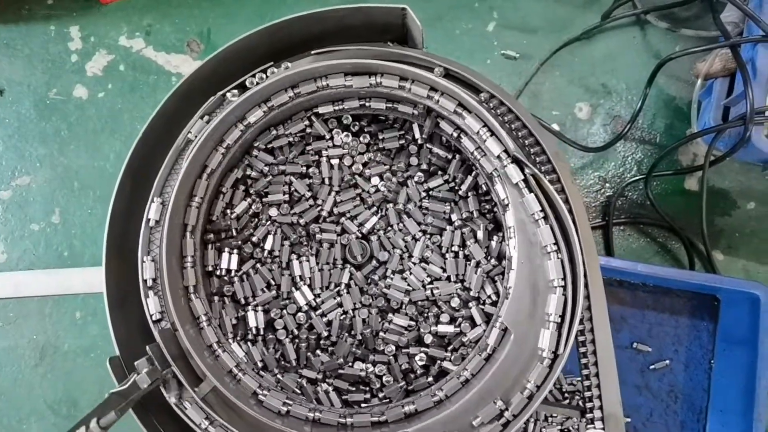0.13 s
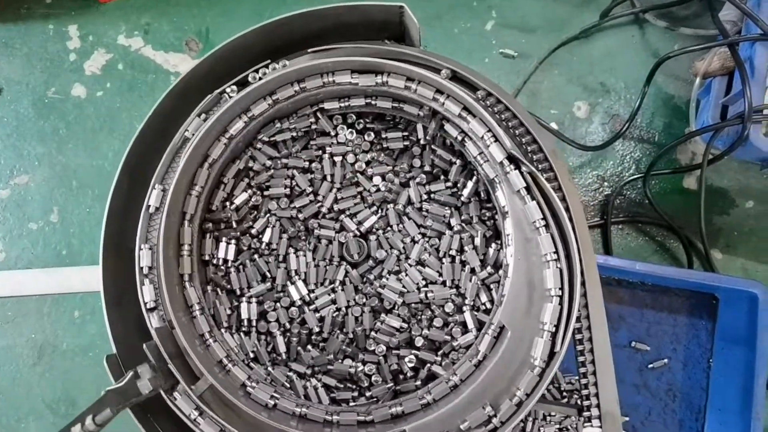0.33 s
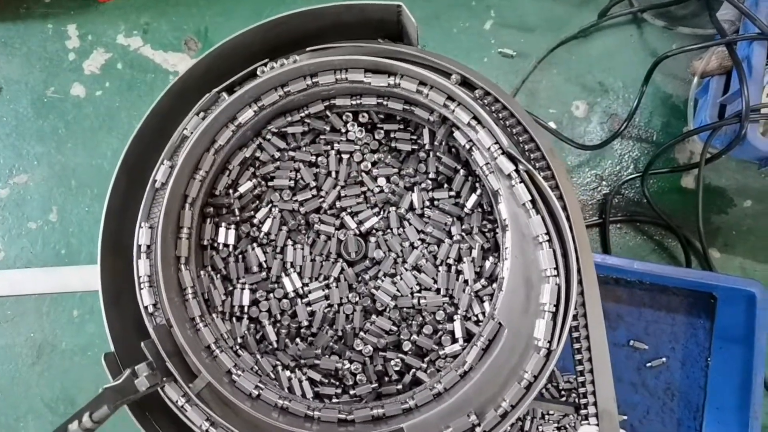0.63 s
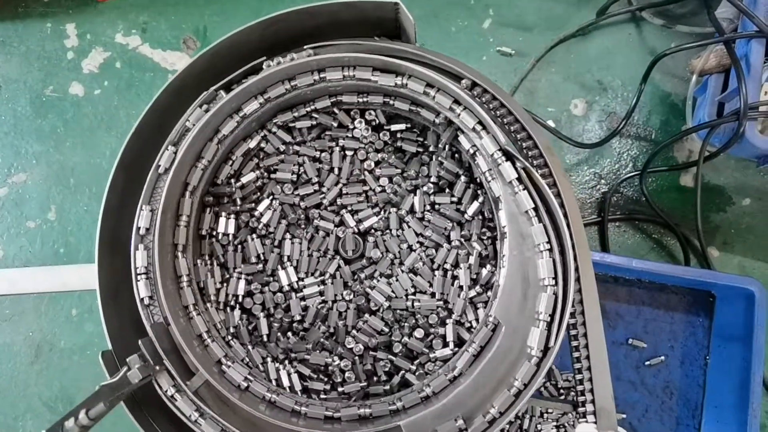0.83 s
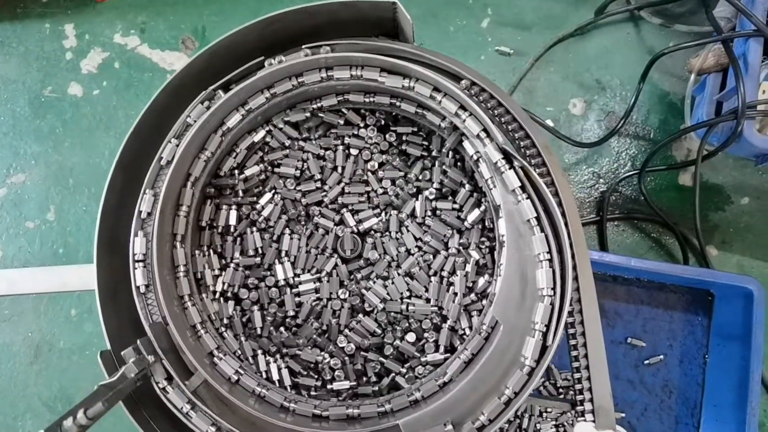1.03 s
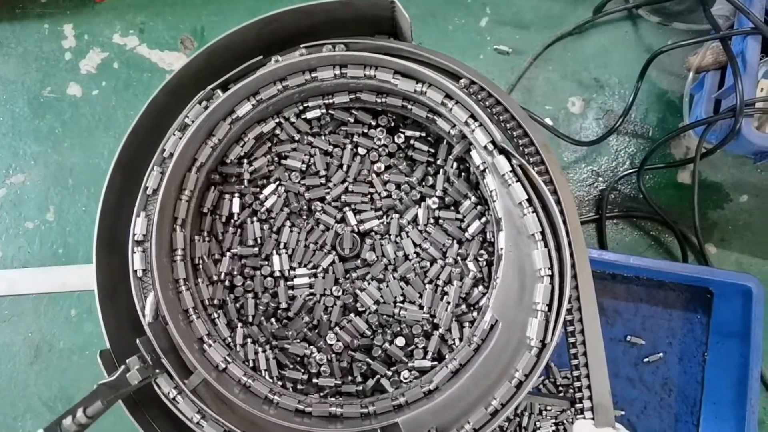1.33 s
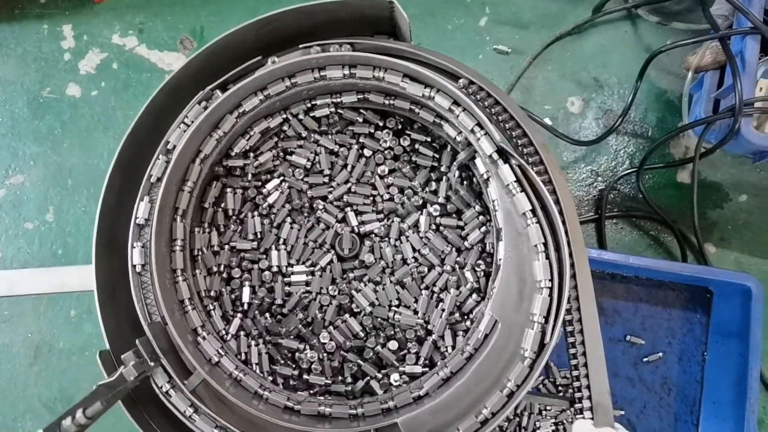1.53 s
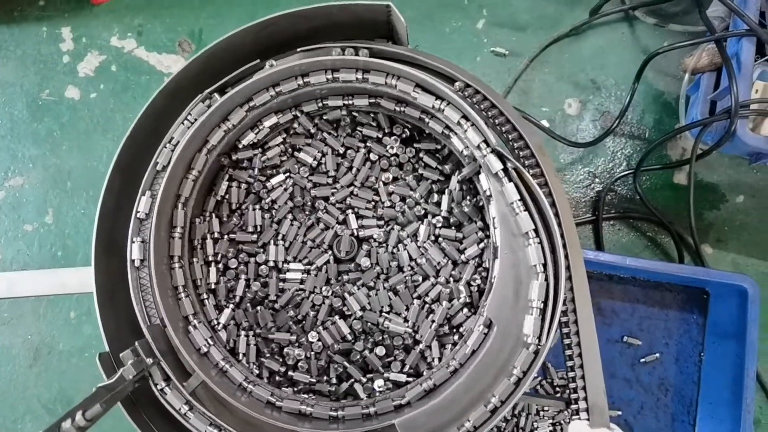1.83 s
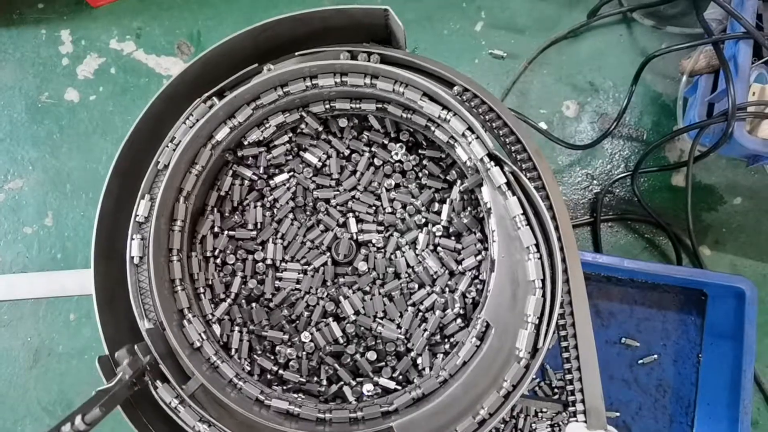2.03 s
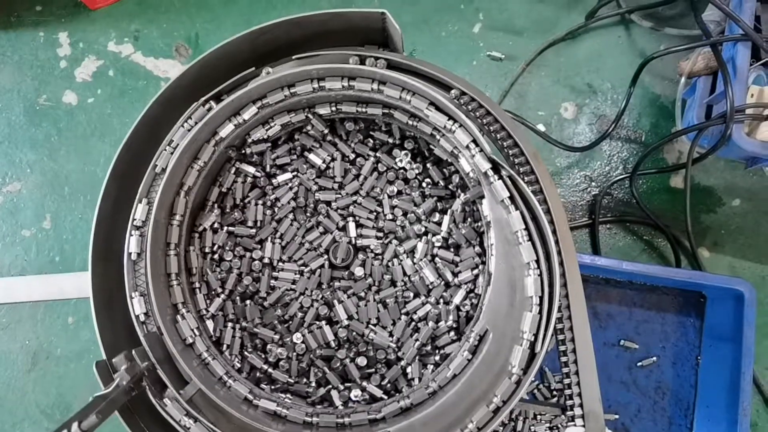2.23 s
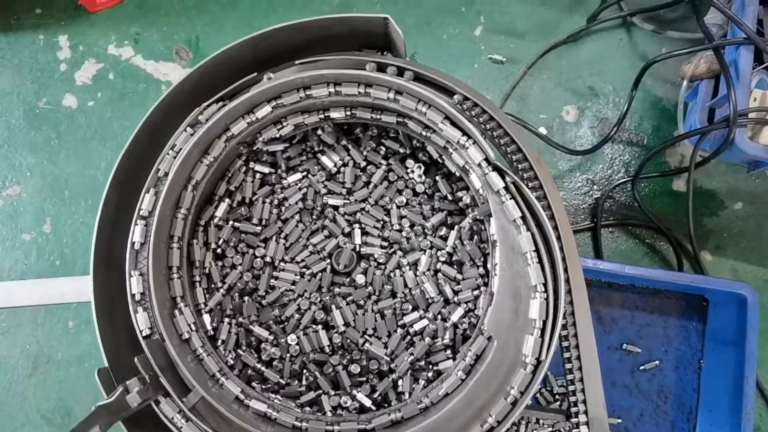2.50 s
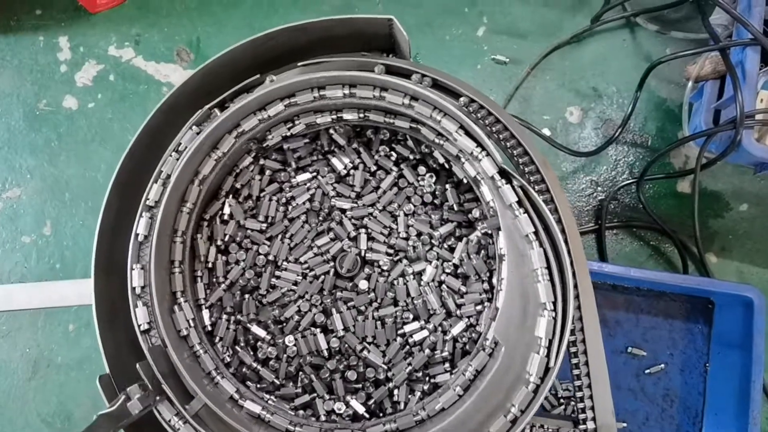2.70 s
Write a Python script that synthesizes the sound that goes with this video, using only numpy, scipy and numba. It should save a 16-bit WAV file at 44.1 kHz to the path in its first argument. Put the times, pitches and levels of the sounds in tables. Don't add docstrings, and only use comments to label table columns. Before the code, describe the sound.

A dense, bright rattle of countless small metal bolts in a vibrating steel bowl runs throughout, with ticks, short pings and a few bounces, above low electric hum and workshop rumble, picked up close in stereo by a phone.

```python
import sys
import numpy as np
from scipy import signal
from scipy.fft import rfft, irfft
from scipy.io import wavfile
from scipy.ndimage import uniform_filter1d
from numba import njit

SR = 44100
rng = np.random.default_rng(int(sys.argv[2]) if len(sys.argv) > 2 else 0)


def gain_from_db(level_db):
    decades = np.asarray(level_db, float) / 20
    return 10 ** decades


def file_out(sig):
    cols = np.atleast_2d(sig).T
    lim = np.clip(cols, -1, 1)
    pcm = np.round(lim * 32767).astype(np.int16)
    wavfile.write(sys.argv[1], SR, pcm)


N = 126126
t = np.arange(N) / SR
MAINS_HZ, FAN_HZ = 49.972, 43.26
TICK_LAG = 9.94


def level(x, db):
    return x * gain_from_db(db) / np.sqrt(np.mean(x ** 2))


def colour(x, points):
    hz, db = np.array(points).T
    f = np.maximum(np.arange(N // 2 + 1) * SR / N, 1)
    gain_db = np.interp(np.log(f), np.log(hz), db, left=db[0] - 13)
    return irfft(rfft(x) * gain_from_db(gain_db), N)


def walk(rate):
    hold = int(SR / rate)
    steps = np.repeat(rng.standard_normal(N // hold + 1), hold)
    w = uniform_filter1d(steps, hold)[:N]
    return w / w.std()


@njit
def ring(n, at, hz, fall, size, lag, contact):
    out = np.zeros((2, n))
    for g in range(len(at)):
        turn = np.exp(complex(-fall[g], hz[g]))
        soften = np.exp(-contact * fall[g])
        for c in range(2):
            start = at[g] + c * lag[g]
            i = max(int(start) + 1, 0)
            z = size[g] * np.exp(complex(-fall[g], hz[g]) * (i - start))
            soft = np.exp(-contact * fall[g] * (i - start))
            for j in range(i, min(n, i + int(5 / fall[g]))):
                out[c, j] += z.imag * (1 - soft)
                z, soft = z * turn, soft * soften
    return out


def hits(at_s, hz, t60, size, lag):
    one = np.ones(len(at_s))
    fall = one * np.log(1000) / (t60 * SR)
    return ring(N, at_s * SR, one * hz * 2 * np.pi / SR, fall, size * one, lag * one, 2.1)


# (time [s], rattle level [dB], hum level [dB])
LOUDNESS = [(0.0, -20, -33), (0.02, -24, -32), (0.22, -24.5, -29.5), (0.24, -24.5, -32),
            (0.94, -24.5, -30.5), (0.97, -23.5, -34), (1.0, -24, -28), (1.04, -25, -35),
            (1.07, -24.5, -30.5), (1.76, -24, -31), (1.78, -26, -41), (1.81, -25.5, -33.5),
            (1.88, -24, -30), (2.09, -24, -32.5), (2.13, -25, -31), (2.3, -24, -33.5), (2.78, -25, -32.5),
            (2.86, -24.5, -34.5)]


def loudness(column):
    rows = np.array(LOUDNESS)
    return np.interp(t, rows[:, 0], rows[:, column])


def shake():
    turn = 2 * np.pi * MAINS_HZ * t
    cycle_db = 1.9 * np.cos(turn - 2 * np.pi * .525)
    half_cycle_db = 4.2 * np.cos(2 * (turn - 2 * np.pi * .03))
    uneven_db = .7 * 1.7 * np.tanh(walk(2 * MAINS_HZ))
    surge_db = .3 * walk(15)
    return gain_from_db(cycle_db + half_cycle_db + uneven_db + surge_db)


def strength(at_s, force, scatter_db):
    extra_db = scatter_db * np.minimum(rng.exponential(size=len(at_s)), 4)
    return np.interp(at_s, t, force) * gain_from_db(extra_db) * rng.choice([-1, 1], len(at_s))


# (pitch [Hz], pitch spread [Hz], time to fade by 60 dB [s],
# level [dB], port lag [samples], lag spread [samples])
FAMILIES = [(800, 59, 0.09, -26, 6.5, 2), (1498, 109.6, 0.048, -19.5, 2.3, 2.3),
            (2080, 110, 0.041, -14, 12.7, 6.1), (2390, 99, 0.052, -11, 15.5, 2.1),
            (3001, 296, 0.048, -9, 12.6, 2.3), (3840, 104, 0.035, -4, 12.8, 3.14),
            (4235, 179, 0.021, -2, 12.75, 1.36), (6120, 236, 0.055, -5.5, 9.74, 4.4),
            (7254, 395, 0.046, -4, 10, 1.3), (9090, 210, 0.057, -7.5, 10.5, 3.84),
            (9630, 448, 0.054, -7, 9.2, 3.47), (11300, 540, 0.068, -7.5, 10, 4)]
# (time [s], centre pitch [Hz], level [dB])
CLANG = [(0.0, 4050, -27.5), (0.17, 4000, -24), (0.28, 4020, -37.5), (0.33, 4020, -31), (0.43, 4060, -32.5),
         (0.54, 3980, -30), (0.67, 4210, -29), (0.94, 3860, -33), (0.95, 3940, -27), (1.11, 4150, -30.5),
         (1.29, 4030, -40), (1.33, 3940, -29.5), (1.82, 4200, -36), (1.86, 4180, -24), (1.86, 4130, -32),
         (2.25, 3955, -33.5), (2.8, 4020, -29), (2.86, 3830, -31)]


def ringing(force):
    out, count, clang = 0, 2600, np.array(CLANG)
    clang_mean = clang.mean(0)
    for hz, spread, t60, db, lag, lag_spread in FAMILIES:
        at = rng.uniform(0, N / SR, count)
        g = rng.standard_normal((3, count))
        size = strength(at, force * gain_from_db(.5 * walk(14)), 2.5)
        tones = hz + spread * 2.397 * np.tanh(g[0] / 2)
        if 3500 < hz < 4700:
            shift_hz = np.interp(at, clang[:, 0], clang[:, 1] - clang_mean[1])
            swell_db = np.interp(at, clang[:, 0], clang[:, 2] - clang_mean[2])
            side = np.sign(hz - clang_mean[1])
            size = size * gain_from_db(.55 * swell_db + side * shift_hz / 60)
            tones = tones + .6 * shift_hz / 2
        fade_s = t60 * gain_from_db(2.5 * g[1])
        out = out + level(hits(at, tones, fade_s, size, lag + lag_spread * g[2]), db)
    return out


# (pitch [Hz], level [dB per Hz])
TICK_COLOUR = [(450, -16.5), (1850, -16.5), (2400, -10), (5100, -10.5), (7000, -4.5), (12000, -10.5),
               (13200, -13.5), (15600, -17)]


def ticks(force):
    count = 30000
    at, tones = rng.uniform(0, N / SR, count), rng.uniform(300, 17000, count)
    sway = 1.0 * np.interp(at, t, walk(2.985))
    lag = TICK_LAG + 2.0 * rng.standard_normal(count) + sway
    taps = hits(at, tones, .004, strength(at, force ** .6, 0), lag)
    return level(colour(taps, TICK_COLOUR), 4.5)


def rattle():
    force = shake()
    bowl = ringing(force) + ticks(force)
    bowl = colour(bowl, [(150, -20), (500, 0)])
    return level(bowl, 0) * gain_from_db(loudness(1) + 2.5)


# (time [s], peak level [dB], loudest ring [Hz], brightness [dB])
DROPS = [
    (0.2464, -15, 5970, -7),
    (0.527, -12, 3830, -24),
    (1.2396, -20, 6330, -4.5),
    (1.5485, -10, 2380, -8),
    (1.5926, -21, 4000, -2),
    (1.767, -11.5, 6100, -14),
    (1.8694, -10, 2080, -20),
    (2.0482, -13, 7700, -18),
    (2.1797, -18, 2300, -20),
]


def drops():
    out, count = 0, 24
    common, own = np.array(FAMILIES)[3:, 0], np.arange(count) < 4
    for s, db, hz, bright_db in DROPS:
        g = rng.standard_normal((3, count))
        at, lag = s + .0015 * g[1] ** 2, 11.9 + 3 * g[2]
        tones = np.where(own, hz, np.resize(common, count)) * (1 + 0.03 * g[0])
        out = out + hits(at, tones, .028, gain_from_db(db - 3 + np.where(own, -5., -12.)), lag)
        out = out + hits(at, 11300 + 1000 * g[0], 0.0055, gain_from_db(db + bright_db), lag)
        snap = gain_from_db(db + bright_db / 2 - 4) * np.sign(g[2])
        out = out + hits(s + g[1] ** 2 / 4000, np.linspace(4500, 13500, count), .004, snap, TICK_LAG)
    return out


def lone_rings(at, hz, db, t60):
    out, families = 0, np.array(FAMILIES)
    usual_lag = np.interp(hz, families[:, 0], families[:, 4])
    lag = np.round(usual_lag * hz / SR) * SR / hz
    for again in range(3):
        g = rng.standard_normal((2, len(at))) * (again > 0)
        late_s, detune = .004 * abs(g[0]), .015 * g[1]
        out = out + hits(at + late_s, hz * (1 + detune), t60, gain_from_db(db - 3.1 * again), lag)
    return out


# (time [s], pitch [Hz], level [dB])
PINGS = [(0.01, 3090, -25), (0.022, 3850, -17), (0.066, 3940, -25), (0.111, 4050, -22), (0.147, 4000, -24),
         (0.178, 3860, -21), (0.226, 3880, -24.3), (0.243, 11800, -24), (0.245, 6030, -22.5),
         (0.245, 6850, -22.9), (0.248, 8910, -31), (0.325, 11710, -25), (0.336, 4220, -22.5),
         (0.517, 4420, -22), (0.527, 3790, -27), (0.627, 4460, -25.3), (0.648, 4230, -25),
         (0.667, 4420, -23.5), (0.685, 6330, -26.2), (0.717, 7580, -24.4), (0.789, 4000, -24),
         (0.927, 5430, -28), (0.948, 3750, -26), (0.968, 11020, -26), (0.99, 4340, -22), (1.106, 4500, -22),
         (1.224, 2450, -27.7), (1.237, 6160, -23), (1.237, 11710, -22), (1.24, 6850, -27),
         (1.257, 2430, -29), (1.347, 3720, -23.5), (1.367, 3740, -20.5), (1.368, 7410, -27),
         (1.408, 4230, -25), (1.429, 4290, -20.9), (1.5, 3870, -25), (1.546, 2430, -24.5),
         (1.551, 11600, -24), (1.551, 12580, -26), (1.725, 4500, -26.1), (1.752, 2430, -26),
         (1.767, 10120, -24), (1.768, 2530, -25), (1.768, 6200, -29), (1.769, 6760, -25.5),
         (1.85, 4280, -19), (1.868, 6860, -27), (1.882, 2100, -33), (1.891, 5640, -32),
         (1.933, 6800, -24.6), (1.949, 6330, -25), (2.026, 6120, -25.8), (2.027, 4180, -24),
         (2.047, 6890, -26.0), (2.05, 8570, -25), (2.05, 12580, -30.5), (2.051, 8060, -23.5),
         (2.308, 3940, -22), (2.39, 3700, -24.9)]


def pings():
    at, hz, db = np.array(PINGS).T
    return lone_rings(at, hz, db + 7, .024)


# (time [s], peak level [dB], pitch [Hz])
KNOCKS = [
    (0.529, -35.5, 980),
    (0.669, -33.5, 780),
    (1.029, -32, 780),
    (1.132, -37, 770),
    (2.109, -34.5, 1456),
    (2.312, -35.5, 778),
]


def knocks():
    at, db, hz = np.array(KNOCKS).T
    return lone_rings(at, hz, db + 1.5, 0.13)


# (time [s], pitch [Hz], level [dB])
CLANKS = [
    (1.868, 2320, -22),
    (1.874, 2080, -17.5),
    (1.884, 2075, -26),
    (2.178, 2350, -20),
]


def clanks():
    at, hz, db = np.array(CLANKS).T
    return lone_rings(at, hz, db, 0.051)


def room(bowl):
    tail = rng.standard_normal((2, SR // 3)) * gain_from_db(-60 * t[:SR // 3] / .3)
    tail = tail / np.sqrt((tail ** 2).sum(1, keepdims=True))
    return gain_from_db(-13) * signal.fftconvolve(bowl, tail, axes=1)[:, :N]


def overtone(hz, k, start, db, waver_db, slip):
    phase = 2 * np.pi * (k * hz * t + start) + slip * k ** 2 * walk(22.0)
    return np.sqrt(2) * gain_from_db(db + waver_db * k * np.tanh(walk(29.93))) * np.cos(phase)


# (multiple of the mains pitch [1], level [dB])
MAGNET = [(2, -35), (4, -55), (5, -54.5), (6, -52), (7, -47), (9, -45.5), (10, -56), (11, -69)]
# (time [s], level [dB])
BUZZ = [(0.0, -44), (0.2, -42), (0.25, -48.5), (0.48, -42), (0.77, -50.5), (0.86, -37), (0.92, -58),
        (0.99, -41.5), (1.15, -44), (1.76, -44.5), (1.8, -49), (1.86, -35.5), (1.89, -50), (1.97, -37),
        (2.02, -59), (2.14, -43.5), (2.83, -44.5), (2.86, -48)]


def magnet():
    out, buzz_db = 0, np.interp(t, *np.array(BUZZ).T)
    for k, db in MAGNET:
        start = .41 if k == 2 else rng.random()
        swell_db = (buzz_db - buzz_db.mean()) * k / 9 * (k > 5)
        out = out + overtone(MAINS_HZ, k, start, db + swell_db, .45, .008)
    return out


# (multiple of the fan pitch [1], level [dB])
FAN = [(2, -40.5), (3, -40.5), (5, -56.5)]


def fan():
    return sum(overtone(FAN_HZ, k, k * -.07, db, .8, .04) for k, db in FAN)


# (pitch [Hz], level [dB per Hz])
SHOP = [(20, -10), (36, 2.5), (52, -8), (72, 1), (170, -6), (420, -11), (560, -19), (1200, -29)]


def shop():
    mid, side = (colour(rng.standard_normal(N) * gain_from_db(1.15 * walk(10.12)), SHOP + [(3000, -83)])
                 for _ in range(2))
    side = colour(side, [(12, -22), (35, -17), (70, -10), (150, -15), (300, -12), (1200, -1)])
    return level(mid + side * np.array([[1], [-1]]), -36.5)


def scene():
    bowl = rattle() + drops() + pings() + knocks() + clanks()
    hum_db = loudness(2)
    low = (magnet() + fan() + shop()) * gain_from_db(hum_db - np.mean(hum_db))
    return (bowl + room(bowl) + low) * gain_from_db(np.array([[.25], [-.25]]))


def low_pass(x):
    return signal.sosfilt(signal.butter(12, 15710, fs=SR, output="sos"), x)


def record(dry):
    return low_pass(dry)


dry = scene()
out = record(dry)
file_out(out)
```